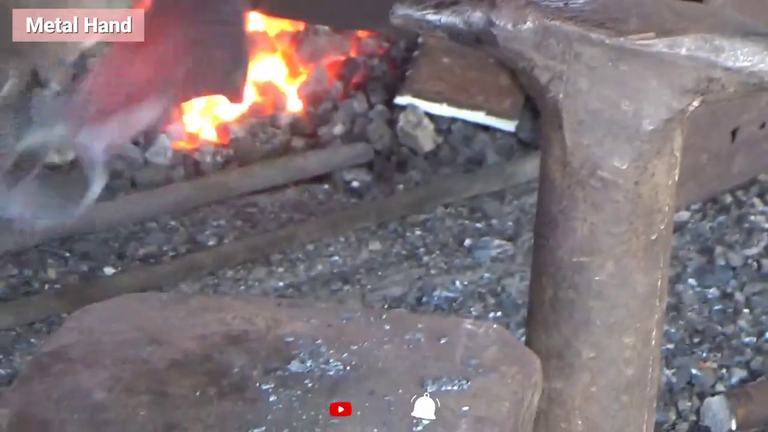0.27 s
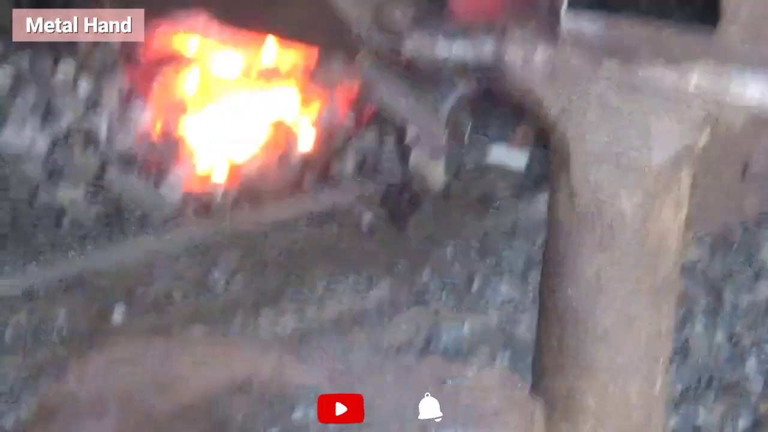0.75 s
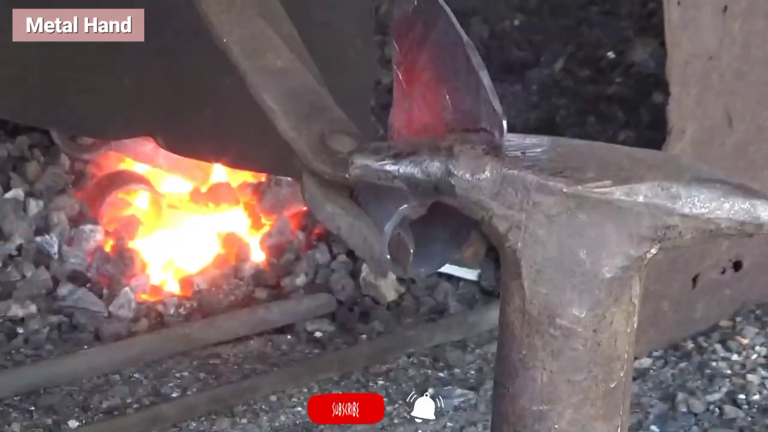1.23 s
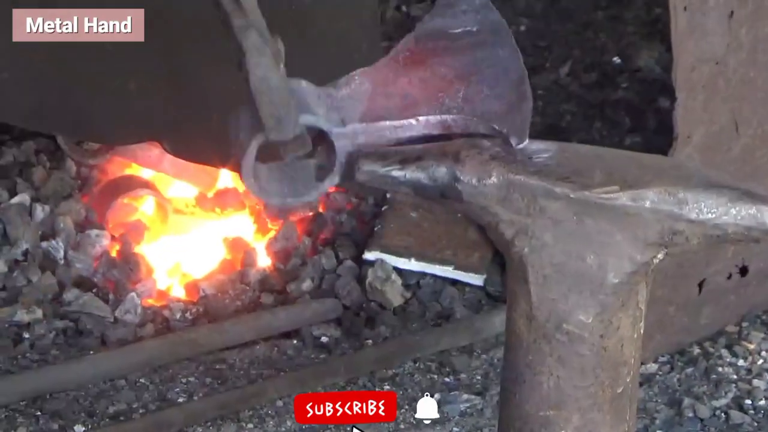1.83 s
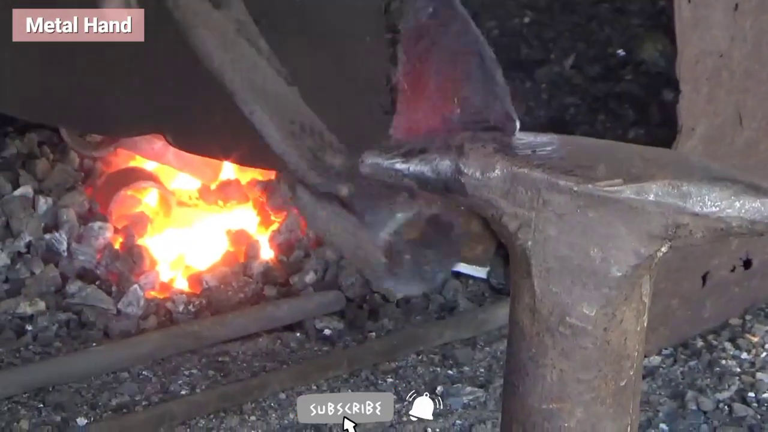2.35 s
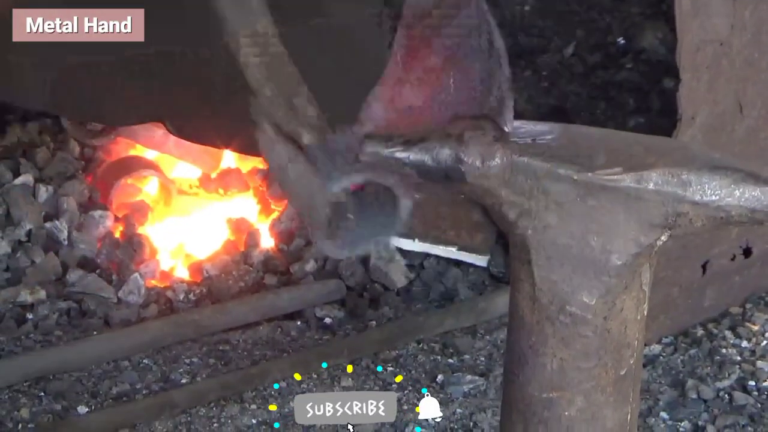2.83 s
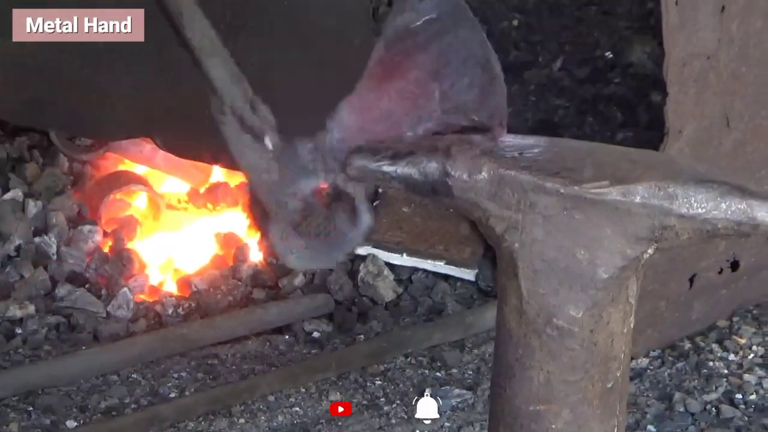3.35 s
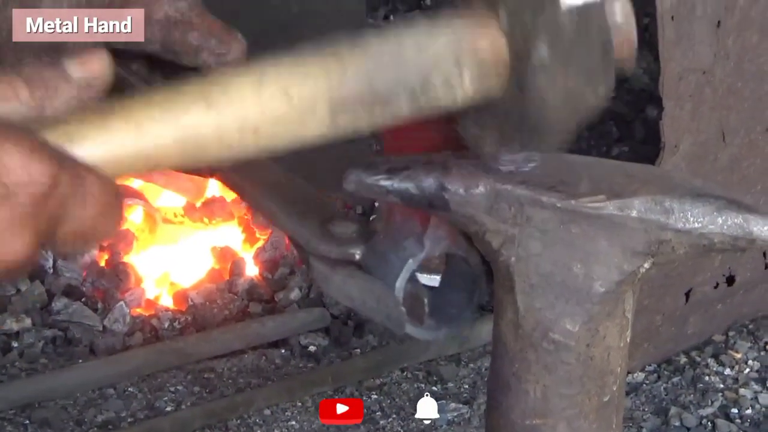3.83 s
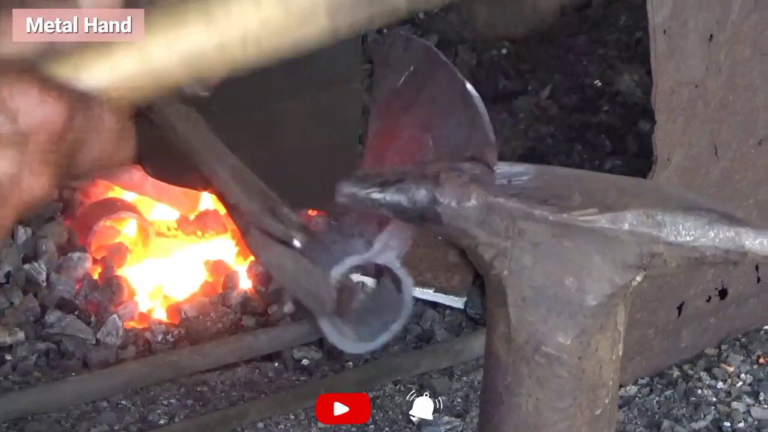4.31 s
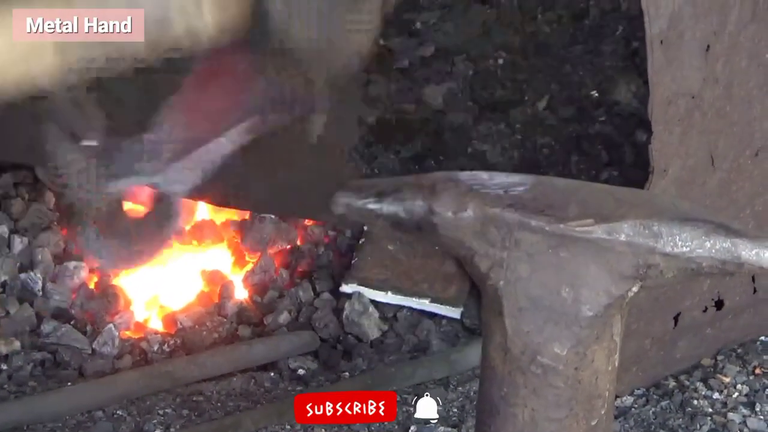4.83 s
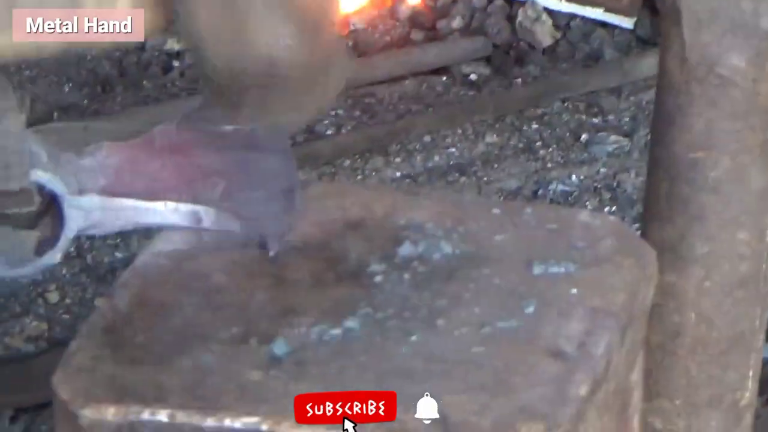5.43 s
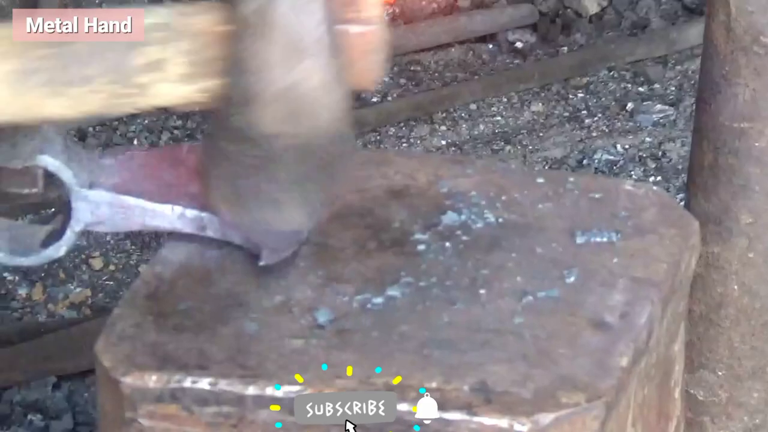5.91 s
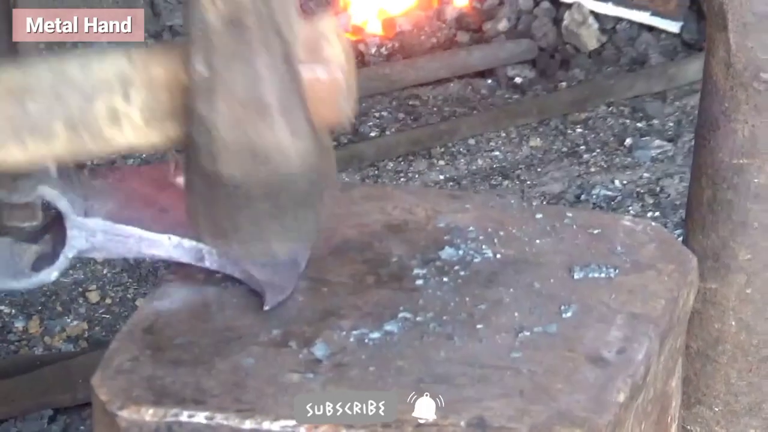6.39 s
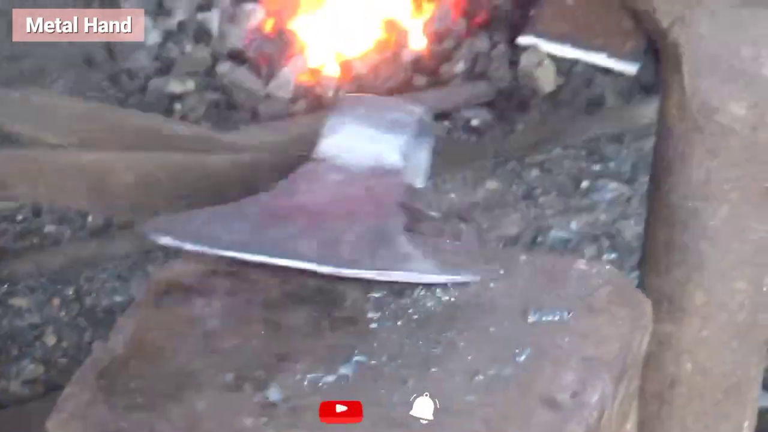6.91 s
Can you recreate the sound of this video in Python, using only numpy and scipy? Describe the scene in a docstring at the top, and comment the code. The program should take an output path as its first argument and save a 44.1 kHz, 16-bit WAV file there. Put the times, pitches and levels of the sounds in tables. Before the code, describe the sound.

At a sheltered open-air forge, a hand hammer hits a hot axe head once on a flat iron block. Tongs and work knock, then eight steady blows land on a stake anvil's horn with a lower, longer ring. Five brighter, short, clipped blows follow on the block. A low fire and blower wash and thin high crank squeaks continue behind. Close stereo microphone, slightly dulled top, quick wall and shelter echoes.

```python
"""Under a forge shelter, fire, yard and blower hum make a low wash throughout, and the blower's crank squeaks.
A hand hammer strikes a hot axe head once on a flat iron block; tongs and work knock before the next blow.
Eight blows follow on the horn of a stake anvil, with the work dragged over iron during the last of them.
Then five blows land on the block again, with more knocks and one more drag between them.
Blows are ringing modes, a noisy crack and a ground thump; a near wall and the shelter echo them."""
import sys
import numpy as np
from scipy import signal
from scipy.io import wavfile
from scipy.ndimage import uniform_filter1d

SR = 44100
rng = np.random.default_rng(int(sys.argv[2]) if len(sys.argv) > 2 else 0)


def master_out(mix):
    """Clip the mix to full scale and print it as 16-bit PCM to the path in sys.argv[1]."""
    frames = np.transpose(np.atleast_2d(mix))
    ceiling = np.clip(frames, -1, 1)
    pcm = np.round(ceiling * 32767).astype(np.int16)
    wavfile.write(sys.argv[1], SR, pcm)


N = 315315  # samples, 7.15 s


def gain_of(db):
    """Turns dB into an amplitude factor."""
    return 10 ** (np.asarray(db) / 20)


def evened(x):
    """Scales a signal to rms 1."""
    return x / np.sqrt(np.mean(x ** 2) + 1e-20)


def read(points, hz):
    """Reads a curve by straight lines on a log-frequency axis."""
    point_hz, value = np.transpose(points)
    return np.interp(np.log(hz + 1), np.log(point_hz + 1), value)


def add(mix, start_s, sound):
    """Mixes a sound in at start_s, cut off where the mix ends."""
    part = mix[..., round(start_s * SR):][..., :sound.shape[-1]]
    part += sound[..., :part.shape[-1]]


def coloured(x, *spectra):
    """Minimum-phase filter, so nothing sounds early; its gain is the sum of the dB spectra."""
    hz = abs(np.fft.fftfreq(4096, 1 / SR))
    level_db = np.maximum(sum(read(points, hz) for points in spectra), -100)
    log_gain = np.log(gain_of(level_db))
    taps = np.fft.ifft(np.exp(np.conj(signal.hilbert(log_gain)))).real[:2048]
    return signal.fftconvolve(x, taps)[:len(x)]


def ring(modes, t, spread_db):
    """Struck iron or ground as dying sines; where the blow lands changes how hard each mode is struck."""
    hz, level_db, t60_s = np.transpose(modes)[:, :, None]
    struck_db = level_db + spread_db * rng.standard_normal(hz.shape)
    partials = gain_of(struck_db - 60 * t / t60_s) * np.sin(2 * np.pi * hz * t)
    return partials.sum(0)


# How alike the shelter's echoes reach left and right: pitch_hz, likeness (0 to 1)
ECHO_LIKENESS = [(150, .85), (600, .62), (2000, .66), (8000, .45)]
# How long the shelter holds each band: pitch_hz, t60_s
SHELTER_DECAY = [(100, 0.49), (260, 0.28), (700, 0.23), (1840, 0.21), (4850, 0.2), (10000, 0.18)]


def shelter(x, wet_db, first_s=.004, rise_s=.011):
    """Evenly dense echoes of random sign that swell quickly, then die band by band."""
    size = SR // 2
    taps = np.zeros((2, size))
    # one echo at a random place in every 20 samples
    slots = np.arange(0, size - 20, 20)
    at = slots + rng.integers(0, 20, (2, len(slots)))
    np.put_along_axis(taps, at, rng.choice([-1., 1.], at.shape), 1)
    taps *= np.clip((np.arange(size) / SR - first_s) / rise_s, 0, 1)

    hz, t, (mid, side) = signal.stft(taps, SR, nperseg=512)
    same = np.clip(read(ECHO_LIKENESS, hz), 0, 1)[:, None]
    mid, side = np.sqrt((1 + same) / 2) * mid, np.sqrt((1 - same) / 2) * side
    decay = gain_of(-60 * t / read(SHELTER_DECAY, hz)[:, None])
    tail = signal.istft(np.array([mid + side, mid - side]) * decay, SR, nperseg=512)[1][:, :size]
    tail /= np.linalg.norm(tail[0])
    return gain_of(wet_db) * signal.fftconvolve(x[None], tail, axes=1)[:, :size]


# Colour of the fire and yard; only its shape counts: pitch_hz, level_db (per Hz)
WASH_COLOUR = [(12, -37), (20, -9.5), (119, -10), (318, -16), (486, -16), (526, -13.5), (570, -19.5),
               (1520, -23.5), (3130, -29.5), (7320, -33.5), (11500, -36), (15000, -77.5), (22000, -120)]
# Swells of the wash; only the swing about each column's mean counts:
# time_s, rumble_db, blower_hum_db, hiss_db
WASH_SWELLS = [(0.0, -56.5, -56, -65.5), (0.46, -61.5, -58.5, -65), (0.67, -58, -59, -65),
               (0.86, -59.5, -62, -66), (1.15, -57.5, -55.5, -67.5), (1.51, -60, -58, -65),
               (1.73, -56, -63, -64), (1.99, -62, -62.5, -65.5), (2.19, -58, -63.5, -68),
               (3.07, -58, -58, -66), (3.27, -61, -67, -69.5), (3.7, -62, -63, -67.5),
               (4.94, -59, -65, -69), (5.28, -56.5, -59, -68.5), (5.48, -60.5, -63, -66.5),
               (6.31, -59, -64.5, -70), (6.57, -60.5, -61, -63.5), (6.89, -56, -67, -67),
               (7.01, -59, -64.5, -68), (7.15, -62.5, -53.5, -59)]
# How alike the wash reaches left and right: pitch_hz, likeness (0 to 1)
WASH_LIKENESS = [(60, 1), (170, 0.93), (490, 1), (1420, 0.11), (4070, 0.4), (11700, 1)]


def wash(patchy_db=1.94, lumpy_db=0.64, level_db=-57):
    """Fire, yard and blower as random short-time spectra; rumble, hum and hiss swell in their own ways."""
    frames, hz = N // 256 + 5, np.fft.rfftfreq(1024, 1 / SR)
    a, b, c, d, patches = rng.standard_normal((frames, 513, 5)).T
    patches = uniform_filter1d(patches, size=10, axis=0)  # smooth over pitch
    patches = evened(uniform_filter1d(patches, size=12, axis=1))  # and over time

    time_s, *levels = np.transpose(WASH_SWELLS)
    frame_s = np.arange(frames) * 256 / SR
    rumble_db, hum_db, hiss_db = (np.interp(frame_s, time_s, db - db.mean()) for db in levels)
    near_hum = np.exp(-((hz - 120) / 45) ** 2)[:, None]
    high = read([(700, 0), (3000, 1)], hz)[:, None]
    swell_db = (rumble_db * (1 - high) + hiss_db * high) * (1 - near_hum) + near_hum * hum_db

    same = np.clip(read(WASH_LIKENESS, hz), -1, 1)[:, None]
    left = a + 1j * b
    right = same * left + np.sqrt(1 - same ** 2) * (c + 1j * d)
    # patches are stronger in the lows than in the highs
    patch_db = (patchy_db + lumpy_db * (0.5 - high)) * patches
    spectra = np.array([left, right]) * gain_of(read(WASH_COLOUR, hz)[:, None] + patch_db + swell_db)
    sound = signal.istft(spectra, nperseg=1024, noverlap=768)[1][:, :N]
    return gain_of(level_db) * evened(sound)


# Squeaks of the blower's crank and, below 5 kHz, of iron on iron:
# loudest_s, rise_s, fall_s, level_db (before waver), pitch_hz (when loudest), glide_hz_per_s
SQUEAK_TONES = [(.018, 0.02, 0.069, -61.5, 5715, -300), (0.095, 0.042, 0.046, -41, 9670, -1500),
                (.36, .015, .04, -58, 8200, -300), (.42, 0.074, .05, -70, 5650, 98),
                (.504, 0.044, 0.17, -56.5, 6200, -500), (0.559, 0.081, 0.11, -29, 10660, -100),
                (0.831, 0.011, 0.18, -54, 6500, -3000), (.838, 0.022, 0.07, -49, 7106, -500),
                (1.02, .15, 0.079, -60.5, 7260, 1197), (1.095, 0.022, 0.13, -60, 5670, -500),
                (1.194, 0.033, 0.065, -44, 10020, 300), (1.473, 0.035, .055, -52, 8340, 400),
                (1.52, 0.073, .03, -65, 5705, 802), (1.685, 0.13, .05, -60.5, 6130, -500),
                (1.707, .16, 0.12, -34, 10665, 115), (2.14, 0.078, 0.045, -61, 7200, 1005),
                (2.188, 0.07, 0.16, -62, 5800, -1000), (2.641, 0.059, 0.074, -58.5, 6170, 103),
                (2.656, 0.024, 0.25, -36.5, 10580, 398), (2.845, 0.082, .08, -50, 10660, 200),
                (3.215, .05, .04, -68.5, 7250, -500), (3.264, 0.028, 0.1, -65, 5870, -1000),
                (3.659, 0.0235, 0.15, -34.5, 10520, 593), (3.773, 0.051, 0.028, -55.5, 1566, 12),
                (3.827, 0.018, 0.039, -57.5, 1570, 12), (4.262, 0.11, 0.021, -51, 1570, 87),
                (4.498, 0.013, 0.13, -39, 10535, 600), (4.99, 0.052, .07, -68, 7100, 100),
                (5.034, 0.031, 0.068, -68, 5760, -1000), (5.3, .03, .08, -63, 6120, 500),
                (5.42, 0.068, .1, -34, 10625, 199), (6.344, 0.05, 0.11, -35, 10640, 2),
                (6.652, 0.018, .025, -54, 2110, 100), (6.66, .04, 0.034, -59, 4230, 100),
                (6.652, 0.055, .07, -62, 6300, -1500), (6.732, 0.081, 0.045, -63, 7500, 109),
                (6.854, 0.069, 0.18, -67, 5770, -500), (7.131, 0.053, 0.068, -44, 8260, 806)]
SQUEAK_RANGE_DB, CURVE = 45.5, 2.32  # depth and power curve of rise and fall
BEAT_HZ, BEAT_DEPTH = 25.9, 0.26


def squeaks(rough=0.77, waver_s=0.011, sides=0.11):
    """Rubbing iron as thin gliding tones that rise, beat as two close pitches would, and fall, wandering apart
    a little by side."""
    out = np.zeros((2, N))
    for loudest_s, rise_s, fall_s, level_db, pitch_hz, glide in SQUEAK_TONES:
        rise_s = min(rise_s, loudest_s)
        t = np.arange(-rise_s, fall_s, 1 / SR)
        noise = rng.standard_normal((4, SR))
        window = np.hanning(max(round(2 * waver_s * SR), 8))[None]
        smooth = evened(signal.fftconvolve(noise, window, "same", axes=1))
        a, b, c, d = smooth[:, SR // 8:SR // 8 + len(t)]
        waver = 1 + rough * (a + 1j * b) + sides * (c + 1j * d) * np.array([[1], [-1]])

        beat = 1 - BEAT_DEPTH + BEAT_DEPTH * np.cos(2 * np.pi * BEAT_HZ * t)
        away = np.clip(np.where(t < 0, -t / rise_s, t / fall_s), 0, 1)
        envelope = gain_of(level_db - SQUEAK_RANGE_DB * away ** CURVE) * beat
        tone = np.exp(2j * np.pi * (pitch_hz * t + glide * t ** 2 / 2))
        add(out, loudest_s - rise_s, envelope * (waver * tone).real)
    return out


# Ring of the tongs: pitch_hz, level_db, t60_s
TONGS_RING = [(1150, -1, 0.045), (1750, -0.5, 0.017), (2100, 2, 0.023), (3886, -15.5, 0.065),
              (4400, -7, 0.023)]
TONGS_DB, HOLLOW_DB = -11.5, -4  # ring against the level at 2 kHz; dip at 4.6 kHz


def touch(low_db, mid_db, high_db, t60_s, rise_s, hits):
    """Each hit gives a puff of coloured noise and a brief ring of the tongs, heard with their echoes."""
    t = np.arange(len(hits)) / SR
    envelope = gain_of(-60 * t / max(t60_s, .002)) * np.minimum(t / rise_s, 1)
    colour = [(90, low_db - 38), (200, low_db), (700, low_db - 7.5), (2000, mid_db),
              (4600, (mid_db + high_db) / 2 + HOLLOW_DB), (6500, high_db - 6.0), (9000, high_db)]
    loudness = signal.fftconvolve(hits, envelope)[:len(t)]
    puff = coloured(rng.standard_normal(len(t)) * loudness, colour)
    click = coloured(np.linalg.norm(envelope) * hits, colour)
    tongs = gain_of(mid_db + TONGS_DB) * ring(TONGS_RING, t, spread_db=6.5)
    tongs = signal.fftconvolve(hits, tongs)[:len(t)]
    return puff + tongs + shelter(click + tongs, wet_db=-4.0)[:, :len(t)]


# Tongs and work touching iron: start_s, level_db at 200 Hz, at 2 kHz and at 9 kHz, t60_s
SINGLE_KNOCKS = [(0.3127, -47, -28.5, -21.5, 0.023), (0.386, -27.5, -68, -69, 0.047),
                 (0.4464, -25.5, -50, -53, 0.14), (0.4679, -18.5, -41.5, -51.5, 0.15),
                 (0.5639, -23, -47, -49, 0.037), (0.6231, -20, -66, -77, 0.026),
                 (0.6843, -24.5, -31, -49.5, 0.16), (1.5834, -18, -51.5, -48, 0.066),
                 (1.773, -27.5, -47.5, -71, 0.088), (1.87, -43.5, -36, -60.5, .03),
                 (2.346, -52, -48.5, -53, 0.04), (3.2617, -32, -47, -54.5, .027),
                 (3.4035, -32.5, -47.5, -70, .022), (3.8208, -32, -52, -52, 0.061),
                 (4.8262, -24.5, -33.5, -20.5, 0.022), (4.879, -47, -47, -63, 0.02),
                 (4.9364, -34, -65, -48, 0.018), (5.069, -38, -54.5, -71.5, 0.063),
                 (6.0812, -27, -45, -74, 0.021), (6.5947, -43, -58, -32.5, 0.015),
                 (6.6426, -44, -57, -42.5, 0.067), (6.7854, -34, -54, -40.5, 0.039)]


def knocks():
    """Tongs and work touch iron once each: a single hit per knock."""
    out = np.zeros((2, N))
    for start_s, *levels_db, t60_s in SINGLE_KNOCKS:
        hits = 1. * (np.arange(SR // 5) == 0)
        add(out, start_s, touch(*levels_db, t60_s, 1 / SR, hits))
    return out


# Work chattering over iron: start_s, length_s, slips_per_s, level_db at 200 Hz, at 2 kHz and at 9 kHz
WORK_DRAGS = [(3.748, .06, 29, -51, -50.5, -56), (4.158, .1, 60, -38, -45, -49),
              (5.919, .09, 39, -34.5, -45, -50.5)]
SLIP_T60_S, SLIP_RISE_S, SLIP_SPREAD_DB = 0.082, 0.0035, 2.5


def drags():
    """Dragged work sticks and slips: a quick train of soft hits that swells and fades."""
    out = np.zeros((2, N))
    for start_s, length_s, rate, *levels_db in WORK_DRAGS:
        hits, at = np.zeros(SR // 3), np.arange(0, length_s, 1 / rate)
        uneven = gain_of(SLIP_SPREAD_DB * rng.standard_normal(len(at)))
        hits[(at * SR).astype(int)] = uneven * np.sin(np.pi * (at + .015) / (length_s + 0.037))
        add(out, start_s, touch(*levels_db, SLIP_T60_S, SLIP_RISE_S, hits))
    return out


# Ground and posts under both anvils: pitch_hz, level_db, t60_s
GROUND_RING = [(155, 0, .24), (178, 0, .16), (229, -5, .14), (275, -3, .14), (317, -2, .14), (415, -5, .12)]


def wall_burst(colour, noise, t, t60_s):
    """A rough near wall scatters the crack into a noise burst, a little different on each side."""
    sides = noise[0] + .35 * noise[1] * np.array([[1], [-1]])
    burst = sides * gain_of(-60 * t / t60_s) * (1 - np.exp(-t / .003))
    burst = np.array([coloured(side, *colour) for side in burst])
    return burst / np.linalg.norm(burst[0])


def blows(table, modes, crack, crack_db, treble_db, upper_db, snap_db, snap_growth,
          contact_s, wall_s, wall_t60):
    """Each blow rings the iron, cracks and thumps the ground; near wall and shelter answer."""
    out, t = np.zeros((2, N)), np.arange(SR // 2) / SR
    for start_s, blow_db, thump_db, tilt_db, wall_db, ring_db in table:
        tilt = [(110, -tilt_db - 3.5), (170, -tilt_db), (500, -tilt_db),
                (2500, tilt_db), (5000, tilt_db), (8000, treble_db)]
        colour = crack, tilt
        noise = rng.standard_normal((3, len(t)))
        click = coloured(1. * (t == 0), *colour)
        snap = coloured(noise[0] * gain_of(-60 * t / .018), *colour)
        click, snap = (gain_of(crack_db) * x / np.linalg.norm(x) for x in (click, snap))

        # a bright blow also rings the upper modes harder
        struck = [(hz, mode_db + ring_db + (upper_db + tilt_db) * (hz > 1900), t60_s)
                  for hz, mode_db, t60_s in modes]
        iron = ring(struck, t, spread_db=-0.5)
        soft = np.clip(t / contact_s, 0, 1)  # hot metal spreads the contact
        thump = gain_of(thump_db) * ring(GROUND_RING, t, spread_db=3.0) * (1 - np.exp(-t / 0.0009))

        # the first snap hardly grows with the blow
        direct_db = snap_db + (snap_growth - 1) * (blow_db + 8.5)
        direct = soft * (gain_of(direct_db) * snap + iron) + thump
        # echoes arrive from all sides, so they carry the mean colour of the crack
        heard = direct + shelter(click + iron, wet_db=2.5) + shelter(thump, wet_db=-3.0)
        add(heard, wall_s, gain_of(crack_db + wall_db) * wall_burst(colour, noise[1:], t, wall_t60))
        add(out, start_s, gain_of(blow_db) * heard)
    # iron of this size radiates little deep bass
    return signal.sosfilt(signal.butter(3, 125, "high", fs=SR, output="sos"), out)


# Blows on the flat block; all levels after blow_db are relative to the blow:
# start_s, blow_db, thump_db, brightness_db, wall_echo_db, ring_db
BLOCK_STRIKES = [(0.162, -11, -35.5, 4.5, 2.5, -14.5), (5.154, -5, -32.5, 1.1, -19, -15.5),
                 (5.685, -9.5, -24, 0.69, -9, -8.5), (6.14, -11, -25, 0.22, 0, -10),
                 (6.438, -11, -42, 2.2, -30, -13), (6.967, -4, -35.5, 0.81, -36, -35)]
# Ring of the block: pitch_hz, level_db, t60_s
BLOCK_RING = [(1456, -18, 0.076), (1520, -3.5, 0.038), (1553, -9, 0.031), (1890, -5.5, 0.029),
              (2150, -12, 0.1), (2364, -0.5, 0.014), (2703, -2.5, 0.023), (3910, -5, 0.037),
              (4660, -11, 0.084)]
# Colour of the crack of contact; only its shape counts: pitch_hz, level_db (per Hz)
BLOCK_CONTACT = [(76, -27.5), (130, -2.5), (237, -12.5), (665, -23.5), (1190, -15), (1460, 1), (1730, -9.5),
                 (5330, -8), (6550, -21), (8840, -13), (10900, -18), (11500, -40.5), (15000, -65.5),
                 (22000, -120)]


def iron_block():
    """Hammer on the flat iron block: a short contact and a mostly brief ring."""
    return blows(BLOCK_STRIKES, BLOCK_RING, BLOCK_CONTACT, crack_db=14.5, treble_db=5.3, upper_db=-0.5,
                 snap_db=2.0, snap_growth=0.11, contact_s=0.0011, wall_s=0.011, wall_t60=0.048)


# Blows on the stake anvil's horn; all levels after blow_db are relative to the blow:
# start_s, blow_db, thump_db, brightness_db, wall_echo_db, ring_db
STAKE_STRIKES = [(0.741, -10, -19, 1.5, -12, -11), (1.294, -10.5, -21, 1.5, -7.5, -11.5),
                 (1.879, -6, -18.5, 9, -18, -12.5), (2.439, -14, -12.5, 1.5, 0.5, -19),
                 (2.997, -8, -22.5, 5, -11, -12.5), (3.526, -13, -16.5, 1, -10, -16.5),
                 (3.976, -14.5, -22.5, 0.5, -16, -20.5), (4.385, -15.5, -20.5, 4, -9, -11)]
# Ring of the stake anvil: pitch_hz, level_db, t60_s
STAKE_RING = [(683, -14, 0.23), (754, -7, 0.035), (933, -5.5, 0.14), (956, -11.5, 0.19), (976, -0.5, .11),
              (1016, -11, 0.044), (1180, -5, 0.084), (1480, -6, 0.033), (1950, -10, 0.067),
              (2320, -11, 0.16), (2375, -10, 0.13), (2770, -27.5, 0.0211), (5490, -22, 0.13),
              (5550, -17, 0.13), (9280, -15, 0.083)]
# Colour of the crack of contact; only its shape counts: pitch_hz, level_db (per Hz)
STAKE_CONTACT = [(76, -22.5), (130, -17.5), (291, -4.5), (594, -14.5), (949, 0), (1060, -7.5), (1280, -14),
                 (2380, -18), (4100, -30.5), (7060, -30.5), (10300, -22), (11500, -36), (15000, -75),
                 (22000, -120)]


def stake_anvil():
    """Hammer on the horn of the stake anvil: a softer contact and a lower, longer ring."""
    return blows(STAKE_STRIKES, STAKE_RING, STAKE_CONTACT, crack_db=16.0, treble_db=2.0, upper_db=-7.5,
                 snap_db=10.5, snap_growth=.1, contact_s=0.0062, wall_s=0.021, wall_t60=0.029)


def scene():
    """The forge in stereo, from the wash behind to the hammer in front."""
    return wash() + squeaks() + knocks() + drags() + iron_block() + stake_anvil()


EDGE_HZ = 11150


def record(dry):
    """The band limit of the pickup: a low-pass at EDGE_HZ."""
    low_pass = signal.firwin(201, EDGE_HZ, window=("kaiser", 4), fs=SR)
    return signal.oaconvolve(dry, low_pass[None], "same")


dry = scene()
out = record(dry)
master_out(out)
```